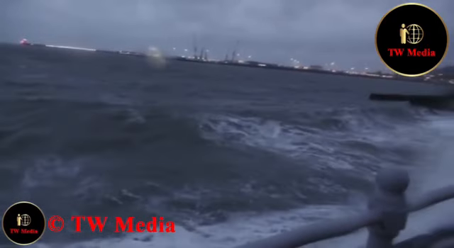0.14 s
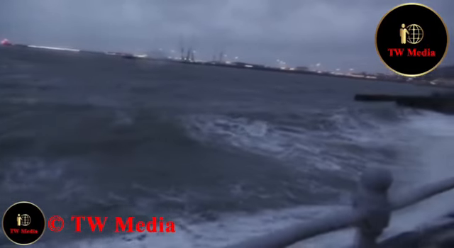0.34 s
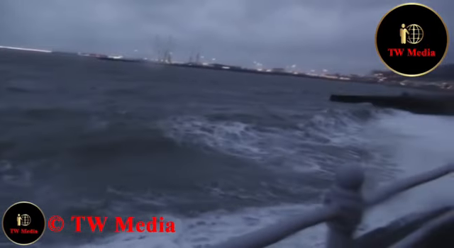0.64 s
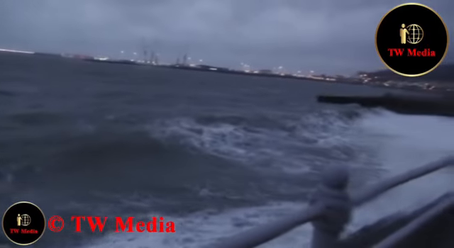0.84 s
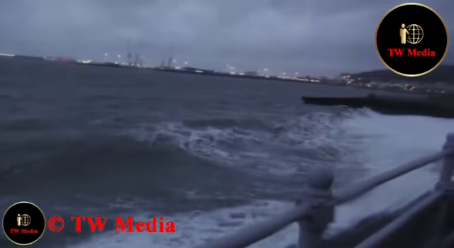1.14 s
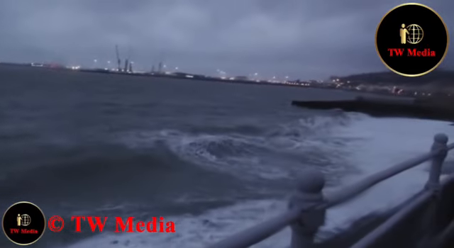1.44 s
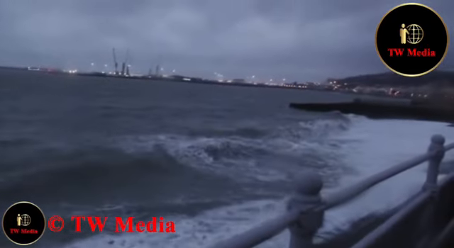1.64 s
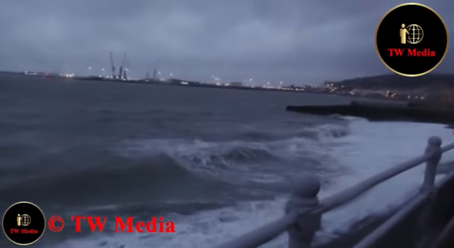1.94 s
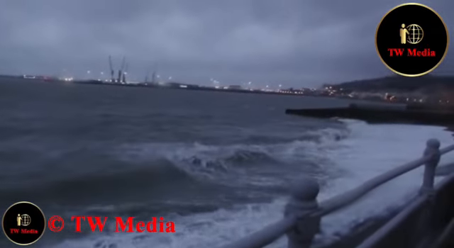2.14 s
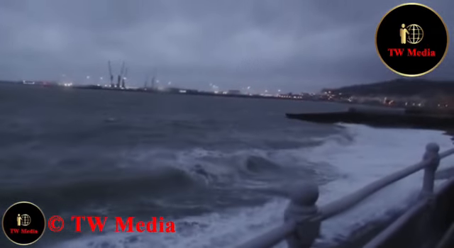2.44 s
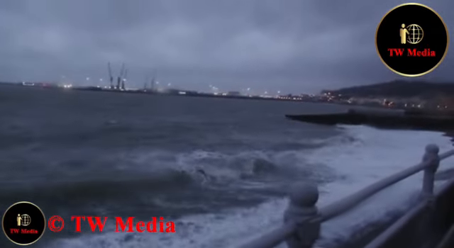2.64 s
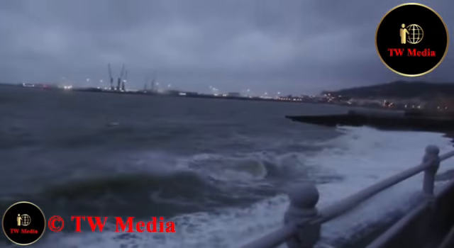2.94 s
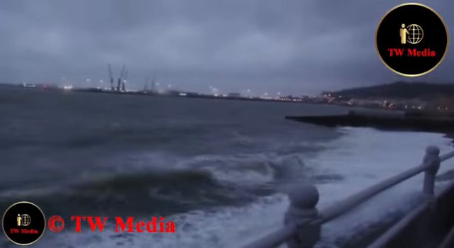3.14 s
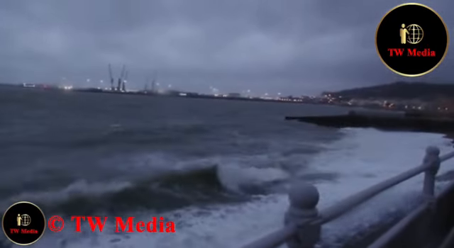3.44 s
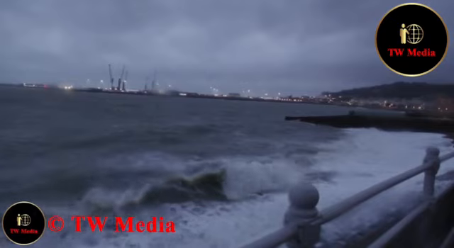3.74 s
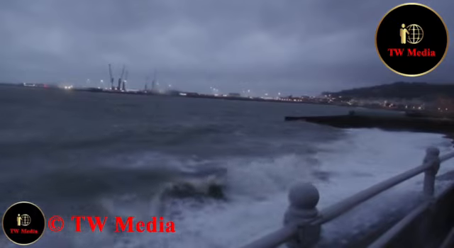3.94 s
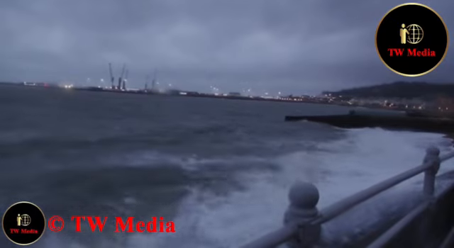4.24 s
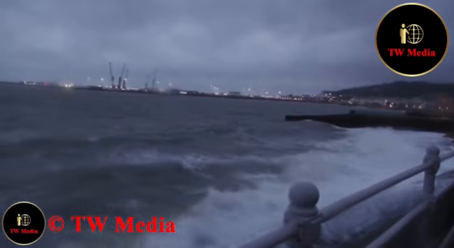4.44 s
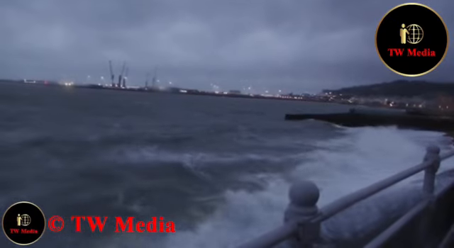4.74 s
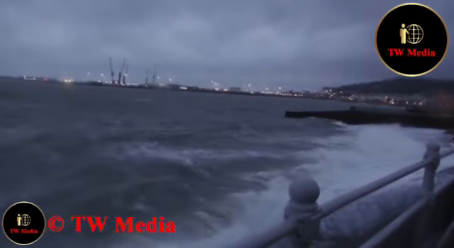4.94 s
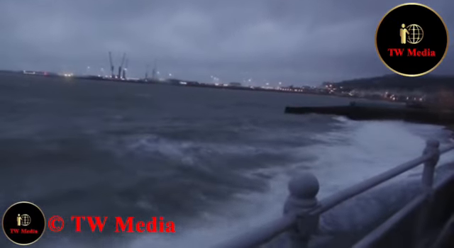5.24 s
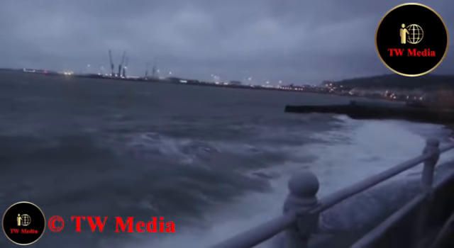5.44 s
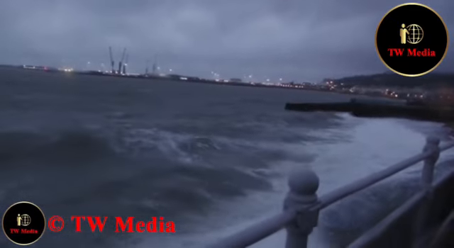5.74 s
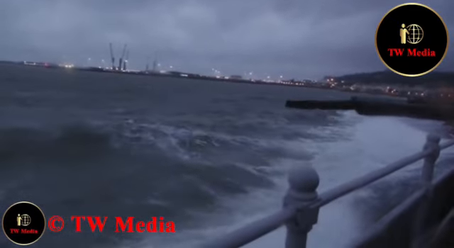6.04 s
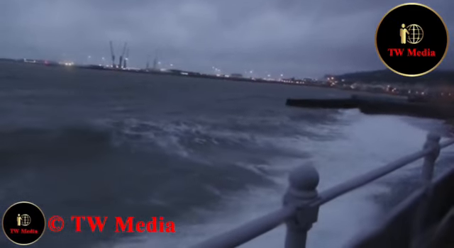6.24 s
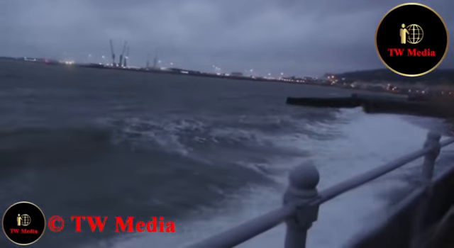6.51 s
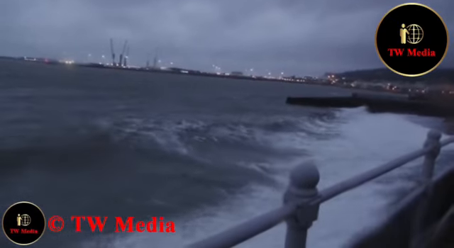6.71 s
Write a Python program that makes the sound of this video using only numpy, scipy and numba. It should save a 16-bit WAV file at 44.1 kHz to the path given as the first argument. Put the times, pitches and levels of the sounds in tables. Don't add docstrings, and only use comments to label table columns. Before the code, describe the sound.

A gale blows directly on a small stereo camera microphone beside a stormy harbour. From 0 s a low, fluttering, boomy roar dominates, mostly below a few hundred hertz, its lumps shifting between channels. Fading spray hisses slightly right, settling to a quieter foamy churn by 1 s. From about 0.9 to 3.8 s repeated gusts make a hollow low thrum, strongest near 3.8 s, while small splashes flicker and the sea gradually rises from 2 s. Around 4.1 s a wave breaks, its broad watery hiss swelling until 4.5 s; another hard wind thump lands near 4.6 s. The wash dips, surges again near 5.25 s and moves left, with a small splash at 5.8 s. It then recedes into faint hiss. Wind continues to 6.9 s, broken by short lulls. Hard buffets briefly squash the level; the treble is thin and grainy.

```python
import sys
import numpy as np
from scipy import signal
from scipy.fft import rfft, irfft, dct, next_fast_len
from scipy.io import wavfile
from scipy.ndimage import uniform_filter1d, map_coordinates
from numba import njit

SR = 44100
rng = np.random.default_rng(int(sys.argv[2]) if len(sys.argv) > 2 else 0)


def to_linear_factor(level_db):
    exponent = np.asarray(level_db, float) / 20
    return 10 ** exponent


def store_wav(level_fs):
    pcm = np.round(np.clip(np.atleast_2d(level_fs), -1, 1) * 32767)
    wavfile.write(sys.argv[1], SR, pcm.T.astype(np.int16))


N = 303011


def unit(x):
    return x / np.sqrt(np.mean(x ** 2) + 1e-20)


def along(points, hz):
    f, v = np.transpose(points)
    return np.interp(np.log(hz + 1), np.log(f + 1), v)


def curves(rows):
    s, *cols = np.transpose(rows)
    return [np.interp(np.arange(N) / SR, s, c) for c in cols]


def bumps(rows):
    t = np.arange(N) / SR
    return sum(db * np.exp(-4 * ((t - s) / max(length, .01)) ** 2) for s, db, length in rows)


def wobble(rate_hz):
    knots = rng.standard_normal((2, int(N * rate_hz / SR) + 4))
    return np.array([map_coordinates(k, [np.arange(N) * rate_hz / SR]) for k in knots])


def filtered(x, response):
    m = next_fast_len(N + 8192)
    return irfft(rfft(x, m) * response(np.fft.rfftfreq(m, 1 / SR)), m)[..., :N]


def sides(db):
    return to_linear_factor(np.array([db / 2, -db / 2]))


def rush(spectrum, alike, patchy_db):
    z = signal.stft(rng.standard_normal((2, N)), nperseg=512)[2]
    field = uniform_filter1d(rng.standard_normal(z.shape[1:]), size=8, axis=0)
    field = uniform_filter1d(field, size=10, axis=1)
    pair = signal.istft(z * to_linear_factor(patchy_db * unit(field)), nperseg=512)[1][:, :N]

    def mid_side_response(hz):
        likeness = np.clip(along(alike, hz), -.9, 1)
        side_share = np.tan(np.arccos(likeness) / 2)
        return to_linear_factor(along(spectrum, hz)) * [np.ones_like(hz), side_share]

    mid, side = filtered(pair, mid_side_response)
    return np.array([mid + side, mid - side]) / np.std(mid)


# frequency in Hz, density in dB per Hz.
WIDE_HISS = [(4500, -31), (5400, -14), (5950, 2), (6500, -1), (7200, -6), (8200, -1), (10500, -4.5),
             (12000, -9)]


def wide_hiss():
    hiss = unit(filtered(rng.standard_normal(N), lambda hz: to_linear_factor(along(WIDE_HISS, hz))))
    level_db = -54 + 0.3 * (curves(SEA)[0] + 36.5)
    level_db = level_db + 0.88 * wobble(9.0)[0] + 2.0 * bumps(BLOWN_SPRAY)
    return to_linear_factor(level_db) * np.array([hiss, -hiss])


# time in seconds, level in dB.
SEA = [(0, -42), (.42, -40.5), (.52, -44), (1.35, -45.5), (1.7, -43.5), (2.8, -40), (3.02, -40),
       (3.14, -40.5), (4.06, -34.5), (4.21, -29.5), (4.52, -30), (4.82, -34.5), (5.25, -30), (5.38, -35.5),
       (5.62, -34), (5.68, -40), (6.1, -42), (6.87, -46.5)]
# centre in seconds, lift
# in dB (negative: dip), length in seconds.
SPLASHES = [(.15, 2.5, .05), (1.12, 0.5, 0.088), (1.65, 2.5, 0.28), (1.78, 1.5, 0.13), (1.98, 2, .05),
            (2.35, 2.5, 0.24), (3.33, 0.5, 0.045), (3.6, 1, 0.14), (3.92, 2.5, 0.07), (4.69, -1, 0.032),
            (5.5, 1, 0.098), (5.78, 8, 0.1), (6.03, 4, 0.028), (.4, 1.5, .06), (2.22, 1, 0.032),
            (3.02, 2.5, 0.14), (4.22, -3, .06), (4.14, .4, .06), (5.73, 1.5, .05), (4.45, 1, .1),
            (5.55, 2, .04), (3.1, 2, .05), (2.4, 1.5, .05), (3.53, -2, .06), (4.32, 1, 0.11), (4.5, 1, .1),
            (0.27, 1, .05), (5.01, 1.5, 0.025), (5.1, 3, 0.026), (5.18, 3, 0.063), (5.26, 3.5, 0.048),
            (5.6, -1, .05), (6.55, 3, 0.079), (5.7, 2, .05), (5.42, 0.5, .06), (6.3, 1.5, .04),
            (4.58, -0.5, .05), (4.9, 0.5, .06), (2.5, -2, .06), (3.48, -2.5, .06), (0.65, 0, .08),
            (1.7, 2, .06), (6.3, 2, .06), (6.8, 1.5, .06)]
# centre in seconds, lift in dB, length in seconds.
BLOWN_SPRAY = [
    (.15, 3, .6),
]
# centre in seconds, left-right in dB, length in
# seconds.
SWEEPS = [
    (5.5, 3.5, 0.34),
    (6.4, 5, .1),
    (2.4, 3, 0.074),
    (5.1, 3, 0.089),
    (4.4, 2, .1),
    (0.16, -5.5, 0.33),
    (1.12, -8.5, .08),
    (5.8, 4, .1),
]
# centre in seconds, width in dB, length in
# seconds.
SPREADS = [(.9, -4, .3), (1.5, -4, .4), (2.65, -12, .9), (3.05, -8, .1), (3.9, -6, .5), (4.17, -15, .12),
           (4.4, 5, .25), (4.63, -14, .06), (4.85, 3, .2), (5.1, -12, .2), (5.26, 5, .05), (5.39, -20, .14),
           (5.57, 5, .12), (5.72, -10, .06), (5.88, -8, .15), (6.25, -5, .2)]
# frequency in Hz, density in dB per Hz.
FOAM = [(410, -24), (700, -1), (1020, -5.5), (1830, -5), (2530, -9), (3010, -9.5), (3520, -7.5),
        (5210, -13), (6200, -24.5), (8060, -35), (13600, -120)]
# frequency in Hz, density in dB per Hz.
SPRAY = [(3290, -35.5), (5600, -2), (6100, -3.5), (7250, -1), (9410, -5.5), (10800, -12), (11600, -19.5),
         (15000, -51), (22000, -120)]
# frequency in Hz, left-right likeness from -1 to 1.
SEA_ALIKE = [(700, 1), (1800, 1), (3000, 0.85), (3700, .96), (5000, 1), (5900, 0.5), (7200, 0.97),
             (9000, -0.18), (11500, -0.2)]


def sea():
    lull_share = 0.23
    foam_db = curves(SEA)[0] + bumps(SPLASHES) - lull_share * bumps(LULLS)
    spray_db, spray_db_per_foam_db = -16, 0.29
    bright_db = spray_db + spray_db_per_foam_db * (foam_db - foam_db.mean()) + bumps(BLOWN_SPRAY)
    pan_db = -0.45 + 1.6 * wobble(4.4)[0] + bumps(SWEEPS)
    churn = to_linear_factor(0.58 * wobble(17)[0] + 0.81 * wobble(60)[0])
    foam = rush(FOAM, SEA_ALIKE, patchy_db=1.1)
    spray = to_linear_factor(bright_db - 0.47) * rush(SPRAY, SEA_ALIKE, patchy_db=1.0)
    left, right = sides(pan_db) * foam
    mid = (left + right) / 2
    side = to_linear_factor(bumps(SPREADS)) * (left - right) / 2
    surf = np.array([mid + side, mid - side]) + sides(pan_db) * spray
    return to_linear_factor(foam_db + 3.0) * churn * surf


# centre in seconds, lift in dB, length in seconds.
SURGES = [(.9, 6.5, .1), (1.22, 6, .12), (1.47, 6, 0.053), (1.95, 6.5, .2), (2.2, 4, 0.16), (2.47, 8, .08),
          (2.68, 7.5, 0.23), (2.9, 5, .1), (3.15, 8, .15), (3.4, 7.5, .08), (3.6, 7.5, .12), (3.8, 11, .07),
          (4.08, 6, .08), (4.57, 11.5, .08), (4.68, 7.5, 0.066), (5.93, 7, .06), (6.35, 7, .07)]
# frequency in Hz, density in dB per Hz.
THRUM = [(70, -60), (125, -8), (150, -0.5), (190, -0.5), (230, -9), (400, -60.5)]


def thrum():
    resonance = rush(THRUM, [(150, .6)], patchy_db=0.3)
    return to_linear_factor(-30.5 + bumps(SURGES)) * sides(1.7)[:, None] * resonance


# time in seconds, eddy strength in dB, slow pressure in dB.
GALE = [(0, -25, -18.5), (.4, -24.5, -18), (.6, -23.5, -18), (1.1, -22.5, -16.5), (1.7, -26.5, -21),
        (2.1, -24.5, -18), (2.75, -23.5, -19), (3.3, -25.5, -17), (3.7, -24, -15), (4.1, -24.5, -18.5),
        (4.7, -24, -19.5), (5.0, -28.5, -22), (5.25, -25.5, -18), (5.6, -28.5, -17.5), (5.9, -25, -20),
        (6.2, -26, -21), (6.55, -25.5, -19), (6.87, -29.5, -19.5)]
# centre in seconds, depth in dB (negative: a brief swell), length in
# seconds.
LULLS = [(.92, 3.5, 0.054), (1.3, 2, 0.054), (1.88, -4, 0.033), (2.89, 3.5, 0.13), (4.61, 6, 0.05),
         (4.81, 7.5, 0.051), (5.38, 0, 0.05), (5.66, 3, 0.037), (5.76, 9.5, 0.094), (5.89, 5.5, 0.12),
         (6.18, 3.5, 0.074), (6.32, 4.5, 0.052), (6.47, 6, 0.049), (6.68, 6.5, 0.027), (3.27, 4, .06),
         (5.7, 3, .08), (4.92, 3, .1), (.16, 3, .05), (1.47, 2.5, .05), (.59, 2.5, .05), (6.52, 3, .05)]
# frequency in Hz, density in dB per Hz.
PRESSURE = [(8.8, -57), (15, -9), (97, 2.5), (171, 0.5), (300, -14), (390, -16.5), (660, -120)]
# frequency in Hz, left-right likeness from -1 to 1.
PRESSURE_ALIKE = [(25, 0.5), (60, 1), (130, 0.68), (250, 0.07)]
# frequency in Hz, density in dB per Hz.
EDDIES = [(90, -47), (170, -2.5), (260, -1.5), (400, -3), (600, -9), (900, -18), (1400, -25.5),
          (2500, -35.5), (5000, -48.5), (9000, -67)]
# frequency in Hz, left-right likeness from -1 to 1.
EDDY_ALIKE = [(150, 0.15), (300, -0.014), (1200, 0.076), (5000, -0.27)]
# frequency in Hz, left-right difference in dB.
PORT_TILT = [(60, 0), (180, 3.5), (340, -0.7), (700, -3.5), (1500, -1)]


def gale():
    roar_db, pressure_db = curves(GALE)
    lull_db = bumps(LULLS)
    roar_db = roar_db - lull_db
    pressure_db = pressure_db - 0.48 * lull_db
    pan_db = 1.5 * wobble(16)[0]
    slow = rush(PRESSURE, PRESSURE_ALIKE, patchy_db=0.5) * to_linear_factor(1.4 * wobble(15))
    lumps = to_linear_factor(0.94 * wobble(11) + 1.9 * wobble(45))
    small = rush(EDDIES, EDDY_ALIKE, patchy_db=1.0) * lumps
    both = to_linear_factor(pressure_db + 1.22) * slow + to_linear_factor(roar_db + 4.0) * small
    return sides(pan_db) * filtered(both, lambda hz: sides(along(PORT_TILT, hz) - .4))


def scene():
    return wide_hiss() + sea() + thrum() + gale()


@njit
def recover(need, fall, rise):
    gain, g = np.empty_like(need), 1.0
    for i in range(len(need)):
        g += (fall if need[i] < g else rise) * (need[i] - g)
        gain[i] = g
    return gain


# frequency in Hz, louder channel over the step in dB.
OVER_STEP = [(340, 40), (1000, 15), (1700, 12), (2400, 11.5), (3800, 10), (5300, 10), (5850, 1), (6600, 2),
             (7200, 1), (8500, 2), (9300, 3), (10500, -.5), (11500, -8)]
# frequency in Hz, scatter in dB.
FRAME_JITTER = [(4800, 1), (6000, 2), (11000, 3)]


def lapped_rounding(x):
    h, lead = 1024, 156
    rise = np.cumsum(np.kaiser(h + 1, 4 * np.pi))
    window = np.sqrt(np.r_[rise[:h], rise[h - 1::-1]] / rise[-1])
    pair = np.pad([x[0] + x[1], x[0] - x[1]], ((0, 0), (lead + h, 3 * h - (N + lead) % h)))
    halves = pair.reshape(2, -1, h)
    blocks = np.concatenate([halves[:, :-1], halves[:, 1:]], axis=2) * window
    a, b, c, d = np.split(blocks, 4, axis=2)
    folded = np.concatenate([-c[..., ::-1] - d, a - b[..., ::-1]], axis=2)
    lines = dct(folded, type=4, norm="ortho")

    power = uniform_filter1d((lines.reshape(2, -1, 32, 32) ** 2).mean(axis=3), size=3, axis=1)
    own_db = 10 * np.log10(np.abs(power) + 1e-14)
    hz = (np.arange(32) + .5) * SR / 64
    louder_db = own_db.max(axis=0)
    hidden_db = np.minimum(louder_db - own_db, 15) * (hz > 1400)
    drift = uniform_filter1d(rng.standard_normal(power.shape), size=5, axis=1)
    drift = unit(uniform_filter1d(drift, size=3, axis=2))
    follows = .45
    step_db = follows * louder_db + (1 - follows) * np.median(louder_db, axis=0)
    step_db = step_db + along(FRAME_JITTER, hz) * rng.standard_normal((2, len(step_db), 1))
    band_jitter = unit(uniform_filter1d(rng.standard_normal(power.shape), size=2, axis=1))
    step_db = step_db + 4.5 * band_jitter
    step_db += hidden_db * (1.25 + .45 * drift)
    step = to_linear_factor(np.repeat(step_db - along(OVER_STEP, hz), 32, axis=2))
    rounded = np.floor((np.abs(lines) / step) ** .75 + .4054) ** (4 / 3)
    lines = np.sign(lines) * step * rounded

    u, v = np.split(dct(lines, type=4, norm="ortho"), 2, axis=2)
    blocks = np.concatenate([v, -v[..., ::-1], -u[..., ::-1], -u], axis=2) * window
    first, second = np.split(blocks, 2, axis=2)
    mid, side = (second[:, :-1] + first[:, 1:]).reshape(2, -1)[:, lead:lead + N] / 2
    return np.array([mid + side, mid - side])


def top_cut(x):
    return signal.sosfilt(signal.butter(12, 11710, fs=SR, output="sos"), x)


def record(dry):
    need = np.minimum(1, to_linear_factor(-8.0) / (np.abs(dry).max(axis=0) + 1e-9))
    fall_s, rise_s = 0.00091, .06
    x = dry * recover(need, 1 / (fall_s * SR), 1 / (rise_s * SR))
    x = x / (1 + np.abs(x / 0.59) ** 5) ** (1 / 5)
    mix = lapped_rounding(x) + .0035
    return top_cut(mix)


dry = scene()
out = record(dry)
store_wav(out)
```